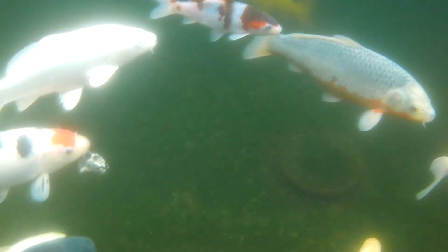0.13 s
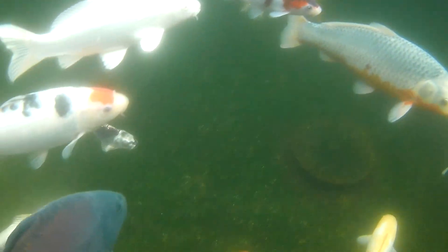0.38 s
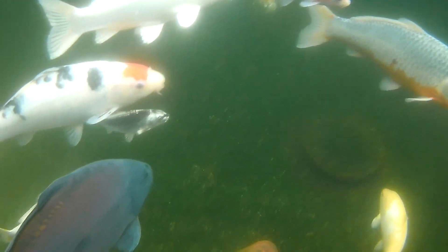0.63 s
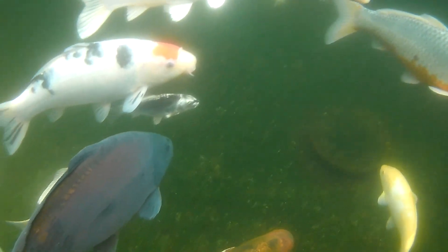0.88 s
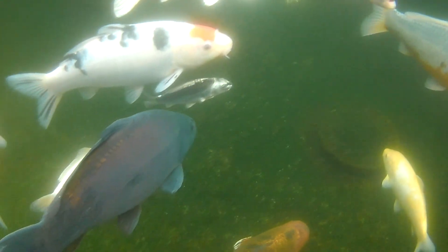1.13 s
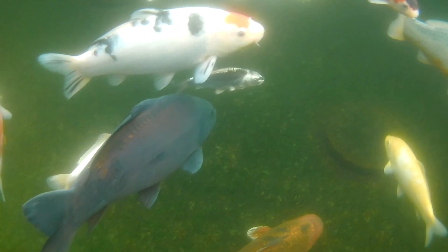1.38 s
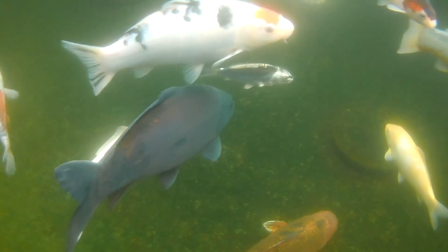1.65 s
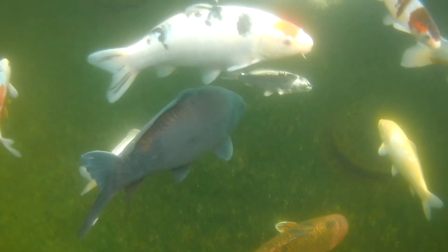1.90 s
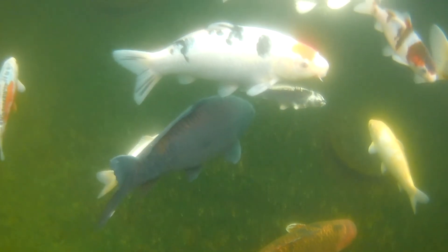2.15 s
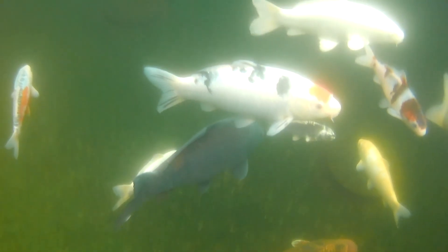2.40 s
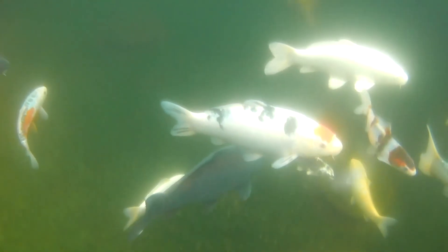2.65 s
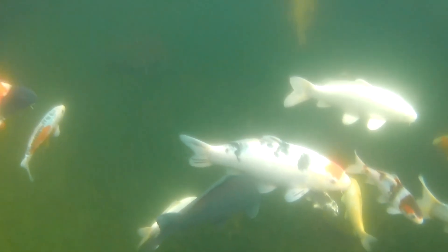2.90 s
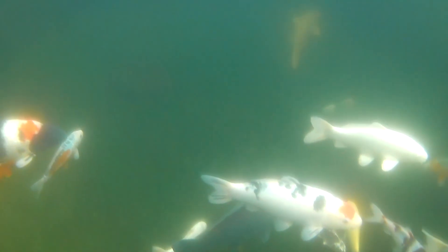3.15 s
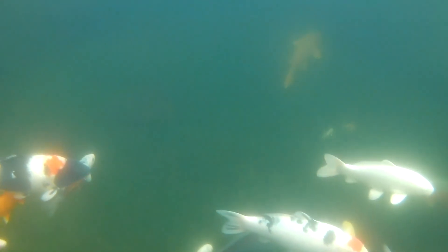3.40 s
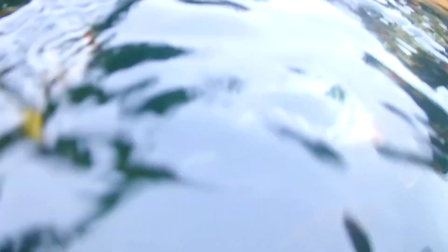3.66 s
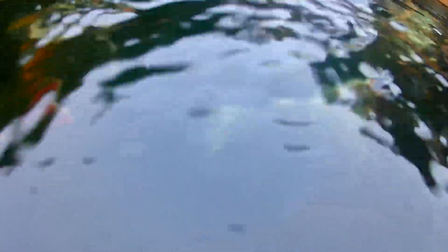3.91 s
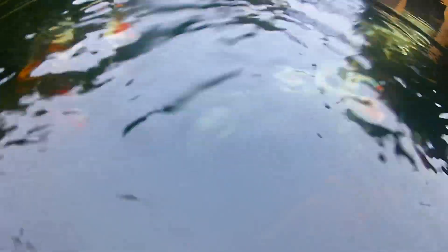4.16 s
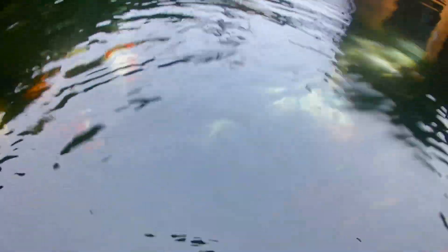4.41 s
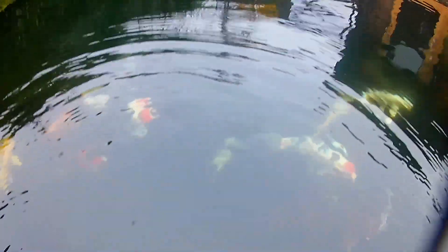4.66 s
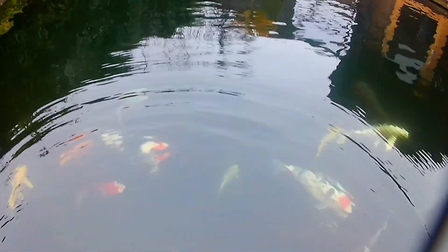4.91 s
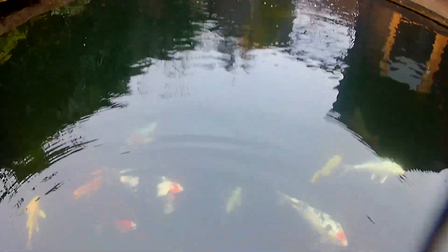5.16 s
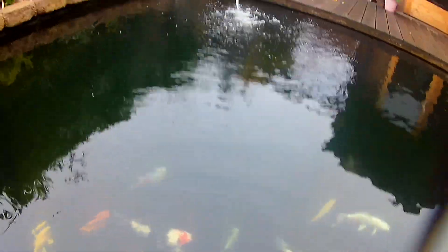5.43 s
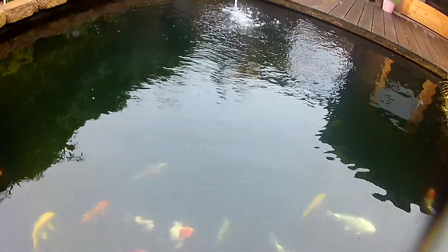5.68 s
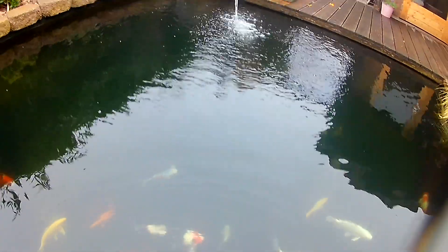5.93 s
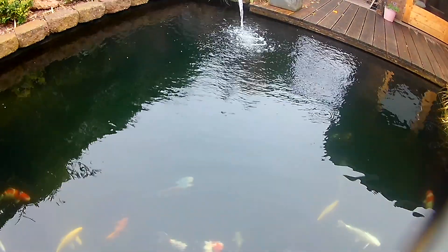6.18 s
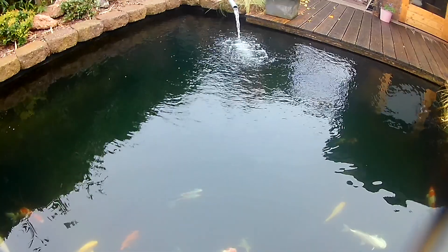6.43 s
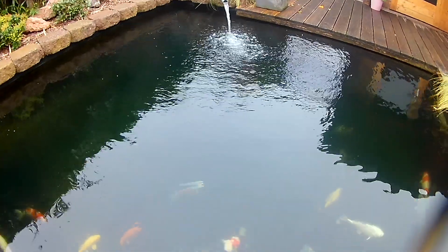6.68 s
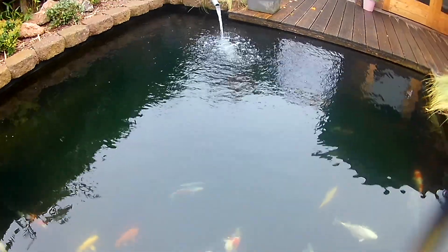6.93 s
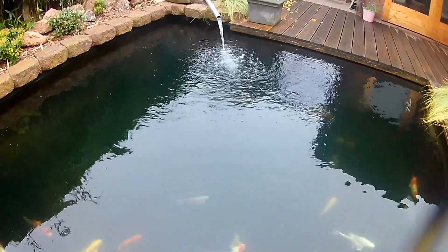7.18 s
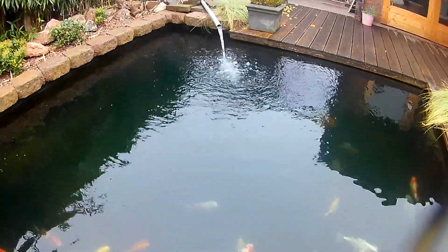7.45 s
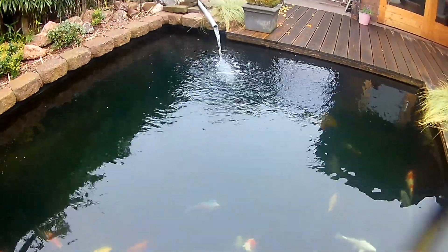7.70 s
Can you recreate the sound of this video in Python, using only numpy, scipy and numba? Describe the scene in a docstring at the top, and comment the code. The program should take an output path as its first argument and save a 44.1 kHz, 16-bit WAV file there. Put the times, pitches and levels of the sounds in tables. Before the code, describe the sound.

Heard from inside a sealed camera housing in a garden pond: soft dull hiss, hollow bubbling of a water spout and low rumbling of the pole. The bubbling fades, a bright wet pop marks the surfacing with a few tiny drops, then handling brings hollow thuds and plastic knocks, loudest just before five and a half seconds. Later come another bump and short dry scrapes, muffled and close.

```python
"""A camera in a sealed housing on a pole hangs in a garden pond. Its hiss, thin whine and treble twitches are
noise and a tone; a water spout's bubbles are clicks that ring the basin, and the swaying pole is low noise.
Soon the pole thuds and jerks: short pushes and swings of its modes. As the housing is lifted out, the spout
fades, knocks ring the lid, and drops splat and pop as bursts of noise and fading tones.
Hands then rub and knock the housing with gritty clicks; at the end dry scrapes slide along the pole."""
import sys
import numpy as np
from scipy import signal
from scipy.fft import rfft, irfft
from scipy.io import wavfile
from scipy.ndimage import uniform_filter1d
from numba import njit

SR = 44100
rng = np.random.default_rng(int(sys.argv[2]) if len(sys.argv) > 2 else 0)


def wrap_up_sound(samples):
    """Save the sound to the file named by the first command line argument, as 16-bit audio."""
    columns = np.atleast_2d(samples).T
    # keep every value between -1 and 1, then stretch to whole-number steps
    tamed = np.clip(columns, -1, 1)
    steps = np.round(tamed * 32767).astype(np.int16)
    wavfile.write(sys.argv[1], SR, steps)


def linear_from_db(decibels):
    """Turn decibels (scalar or array-like) into linear amplitude factors; 0 gives 1."""
    return 10 ** (np.asarray(decibels, float) / 20)


N = 344729
T = np.arange(N) / SR  # time of every sample, s

# colour of the camera's hiss: f/Hz, relative level/dB
HISS_COLOUR = [(80, -35), (140, -3.5), (300, -9.5), (500, -13.5), (1100, -20), (1450, -22), (2150, -21),
               (3000, -27), (4200, -29), (6200, -31.5), (7800, -38), (8800, -35), (15700, -35)]
# thin whine of the camera: f/Hz, mean level/dB
WHINE = (1087, -80)
# middles of the treble twitches of the electronics: t/s
TWITCH_TIMES = [.108, .273, .405, 2.066, 2.225, 2.422, 2.636, 2.865, 3.064, 3.217, 3.361, 3.54, 3.718,
                3.887, 4.111, 4.265, 4.414, 4.589, 4.762, 4.985, 7.281, 7.413, 7.557, 7.691]
# treble bands in each twitch: f/Hz, width/Hz, relative level/dB
TWITCH_BANDS = [(10460, 1300, 13), (11400, 710, 8), (9000, 900, -7)]
# spout heard under water, fading as the housing nears the surface:
# t/s, level/dB, middle group relative level/dB, top group relative level/dB
SPOUT_LEVELS = [(0.0, -56, -7, -18), (0.5, -57, -8, -23), (0.9, -56.5, -7.5, -18.5),
                (2.05, -54.5, -8.5, -25), (2.3, -59, -5.5, -16), (2.6, -61, -2.5, -10),
                (2.85, -60.5, -7, -11.5), (3.05, -67, -0.5, -6), (3.42, -77, -7, -15)]
# basin resonances in a low, a middle and a top group, each: f/Hz, width/Hz, relative level/dB
BASIN_GROUPS = [
    [(606, 53, 0), (763.4, 30, -3), (836, 47, -3.5), (890, 34, -7), (1062, 48, -12)],
    [(1355, 67, -5), (1602, 118, -2), (1940, 84, -3.5), (2080, 100, -2)],
    [(2596, 190, 0), (3030, 300, -8), (3480, 240, -9)],
]
# large clumps of bubbles that stand out: t/s, low group boost/dB, middle group boost/dB
BUBBLE_CLUMPS = [(.43, 4.5, 1), (.51, 8.5, 0), (.83, 3.5, 8), (0.896, 11.5, 12.5), (.99, 3, 1),
                 (1.04, 0, 5), (1.15, 8, 3), (1.22, 2, 2), (1.33, 2.5, 4), (1.43, -1.5, 6), (1.47, 9, -5),
                 (1.51, 1.5, 5), (1.6, 7, -6), (1.72, -7, 6.5), (1.77, 6.5, -5), (1.9, -0.5, 5),
                 (2.039, 7, 3.5), (2.25, 5, 9.5), (2.84, 0, 1)]
# random level flutter of the bubbles in the low, middle and top group: spread/dB
BUBBLE_FLUTTER = (2.5, 2.5, 5)
# pole swaying in the hand: t/s, lowest modes level/dB, next modes level/dB
SWAY_LEVELS = [(0.0, -56, -55), (0.5, -48.5, -57.5), (1.4, -51.5, -56.5), (1.72, -44, -56.5),
               (2.0, -52.5, -61.5), (2.45, -47.5, -57), (2.7, -42, -63), (3.1, -41, -57),
               (3.85, -44, -54.5), (4.2, -49, -61.5), (4.45, -48.5, -53.5), (4.75, -40.5, -54.5),
               (5.2, -47, -54.5), (5.65, -42.5, -52.5), (6.3, -39, -58.5), (6.55, -47.5, -56.5),
               (7.0, -44, -63), (7.5, -46, -62.5), (7.82, -46, -62)]
# ringing modes of the pole: f/Hz, relative level/dB, time to fall 60 dB/s
POLE_MODES = [(45.8, 1, .25), (70, -2.5, 0.12), (108, -2.5, 0.2), (170, -2.5, 0.1), (270, 5, 0.067),
              (337, -4.5, .07)]
# blows on the pole: t/s, peak level/dB, favoured f/Hz, push length/ms, direction/+-1
POLE_BLOWS = [(0.2575, -26, 72, 5.2, -1), (1.731, -40.5, 70, 13, 1), (2.704, -41.5, 70, 6.9, 1),
              (2.998, -38, 70, 12, 1), (3.129, -40.5, 70, 13, 1), (3.69, -42, 108, 6.5, 1),
              (4.604, -37, 170, 4.2, 1), (4.916, -37.5, 108, 5, 1), (5, -36.5, 108, 3.7, 1),
              (5.146, -37, 170, 3.6, 1), (5.274, -32, 170, 3.7, -1), (5.299, -24.5, 170, 3.7, -1),
              (5.338, -23, 70, 5.4, -1), (5.367, -25, 89.5, 3.4, 1), (5.418, -15.5, 108, 2.5, 1),
              (5.448, -9, 101, 2.8, 1), (6.183, -31.5, 117, 2.2, 1), (6.294, -39.5, 270, 3.1, 1),
              (6.41, -38, 117, 3.5, 1), (6.6645, -18.5, 77, 2.4, -1), (6.741, -34, 80.4, 2.2, 1),
              (6.787, -30.5, 101, 2.2, 1), (7.546, -43, 108, 6.1, 1)]
# jerks of the hand that swing the whole pole: t/s, level before rise and fall/dB, f/Hz
HAND_JERKS = [(.262, -38, 44.6), (4.598, -29.5, 39.8), (4.921, -26, 41), (5.02, -24.5, 38), (5.35, -29, 43),
              (5.438, -18.5, 43), (6.78, -34, 41)]
# housing modes below the lid's pitch: f/Hz, width/Hz, relative level/dB
SHELL_MODES = [(566.6, 45.7, 3.5), (890, 109, -1.5), (1115, 66, -6), (1350, 280, -10.5), (333, 34, -2.5)]
# housing modes above the lid's pitch: f/Hz, width/Hz, relative level/dB
EDGE_MODES = [(2680, 50, -1.5), (3270, 550, 1), (3700, 120, 4), (4956, 120, -7), (6100, 170, -10.5)]
# knocks and ticks on the housing:
# t/s, lid peak level/dB, lid f/Hz, shell relative level/dB, edges relative level/dB
HOUSING_KNOCKS = [(2.8075, -45, 1650, 6.5, -13), (2.838, -58, 1630, -3, -26),
                  (4.148, -57.5, 2080, -17, -10), (4.5459, -37, 2080, -10.5, -3.5),
                  (4.7034, -51.5, 2410, -16, -15), (5.001, -50, 1740, -12, -25),
                  (5.1454, -49.5, 1700, 4, -19), (5.1816, -38.5, 1835, -5, -12),
                  (5.2708, -33.5, 1880, -15, -24), (5.282, -48, 1960, -14, -33),
                  (5.295, -27, 1750, -2.5, -23), (5.3283, -34, 1940, 0, -24), (5.3482, -57, 1700, 3, -23),
                  (5.362, -29, 1700, -9, -19), (5.367, -32, 1780, -1, -22), (5.4153, -26, 2020, -1.5, -20),
                  (5.444, -23, 1830, -8.5, -20), (6.6615, -30, 1940, 1.5, -36),
                  (6.7352, -41.5, 1900, -2.5, -26), (6.757, -57, 1920, 0, -12),
                  (6.787, -37, 1790, -5.5, -15), (6.81, -59, 1750, 8, -19), (7.6892, -51.5, 2000, 2, -15)]
# drops splatting on the housing as it leaves the water:
# t/s, bright spot peak level/dB, bright spot f/Hz, broad splat relative level/dB
WATER_DROPS = [(3.431, -46, 6030, 3), (3.567, -47, 2430, 1), (3.697, -62.5, 6100, -6),
               (3.939, -57.5, 2780, -7), (4.478, -59, 1750, -6), (4.685, -56, 2440, 5.5),
               (4.727, -58, 3380, 1)]
# a drop pops on the lid as it leaves the water: t/s, level/dB
LID_POP = (3.4508, -16)
# ringing of that pop: f/Hz, relative level/dB, time to fall 60 dB/s
LID_POP_MODES = [(2187, 2, 0.029), (2355, 0, 0.022), (655, -31, 0.1), (3514, -23.5, 0.012)]
# skin rubbing the housing:
# start t/s, length/s, start level/dB, change over the stroke/dB, shell relative level/dB
SKIN_RUBS = [(4.599, .12, -55, -18.5, -3.5), (4.912, 0.15, -64.5, -2.5, -5.5),
             (5.251, 0.061, -54.5, 9, -3.5), (5.293, 0.165, -50, -6, 6), (6.178, .21, -58.5, -1, -4),
             (6.398, .1, -65, -4, -3)]
# dry scrapes along the pole:
# start t/s, length/s, start level/dB, change over the stroke/dB, start f/Hz, end f/Hz
POLE_SCRAPES = [(7.5218, 0.066, -33, -6, 1940, 2050), (7.593, .04, -37.5, -4, 2400, 2400),
                (7.697, 0.12, -63, 10, 2000, 2050)]
# broad colour of the scrapes: f/Hz, relative level/dB
SCRAPE_TONE = [(250, -16), (335, -7.5), (420, -28), (600, -13.5), (880, -2.5), (1400, -5.5), (2200, 0),
               (2900, -11), (3650, -5), (4900, -18.5), (5350, -35), (6400, -31), (7400, -41), (8000, -16),
               (9300, -9), (15000, -36.5)]
# pole resonances rung by the scrapes: f/Hz, width/Hz, mean relative level/dB
SCRAPE_MODES = [(900, 190, -4.5), (1470, 180, -18), (3600, 150, -13), (4550, 230, -22)]

HISS_DB, TWITCH_DB, TWITCH_LENGTH_S = -65, -79.5, 0.035
CLUMP_S = 0.018  # half-width of a clump, where its boost is down to 1/e
JERK_RISE_S, JERK_T60_S = 0.0166, 0.44
JERK_UNDER_HZ, JERK_UNDER_DB = 27.3, -3  # the lowest mode swings along
LID_WIDTH_HZ, EDGE_HZ = 197, 3600  # width of the lid's ring; edge pitch favoured by a knuckle
CONTACT_MS, DROP_MS = 1.51, 3.0  # each force is strongest halfway through this time
SHELL_RATTLE_S, SHELL_RATTLE = 0.01, 0.33  # the shell chatters on after a knock: decay, share
CRACK_DB, EDGE_CRACK_DB = -20, -14.5  # broad snap of a contact, under the ring of lid and of edges
DRIPS_START_S, DRIPS_END_S, DRIPS_PER_S, DRIPS_DB = 2.8, 4.8, 7.8, -62.5
RUB_EDGE_S, SCRAPE_T60_S = 0.01, 0.069  # softening of a rub's ends; fading after a scrape
WALL_HZ, WALL_LEAK_DB = 7090, -29  # treble above this pitch only leaks through the wall


def unit(x):
    """Scale to an rms (average strength) of 1."""
    return x / np.sqrt(np.mean(x ** 2))


def curves(table):
    """Draw each column against time; the first falls silent outside the table."""
    s, db, *rest = np.transpose(table)
    level = np.interp(T, s, db, left=-200, right=-200)
    return [level] + [np.interp(T, s, column) for column in rest]


@njit
def svf(x, hz, width):
    """Band-pass filter whose centre can move; two stored states carry the ringing."""
    y, b, l = np.empty(len(x)), 0., 0.
    for i in range(len(x)):
        g, k = np.tan(np.pi * hz[i] / SR), width / hz[i]
        v = (b + g * (x[i] - l)) / (1 + g * (g + k))
        b, l, y[i] = 2 * v - b, l + 2 * g * v, k * v
    return y


def band(x, hz, width):
    """One resonance, with a fixed or moving pitch."""
    return svf(x, hz + np.zeros(len(x)), 1. * width)


def body(x, modes):
    """Resonances side by side, alternate in sign."""
    return sum((-1) ** k * linear_from_db(db) * band(x, hz, w) for k, (hz, w, db) in enumerate(modes))


def rfftfreq(n):
    """Pitch of each step of the spectrum, in Hz."""
    return np.arange(n // 2 + 1) * SR / n


def colour(x, points):
    """Shape the spectrum by (Hz, dB) points, then scale to rms 1."""
    hz, db = np.transpose(points)
    f = np.maximum(rfftfreq(len(x)), 1)
    gain = linear_from_db(np.interp(np.log(f), np.log(hz), db))
    return unit(irfft(rfft(x) * gain, len(x)))


def walk(rate):
    """Slow smooth chance, about rate new values per second, rms 1."""
    k = int(SR / rate)
    steps = np.repeat(rng.standard_normal(N // k + 1), k)
    return unit(uniform_filter1d(uniform_filter1d(steps, k), k)[:N])


def grains(rate, spread_db):
    """Random clicks, about rate per second, a few much larger than the rest."""
    happens = rng.random(N) < rate / SR
    return happens * rng.choice([-1., 1.], N) * linear_from_db(spread_db * rng.exponential(size=N))


def add(out, s, x):
    """Mix x in at time s."""
    i = int(s * SR)
    out[i:i + len(x)] += x[:N - i]


def camera():
    """The camera's own noise: hiss, a whine of slightly wavering level and gated treble twitches."""
    hiss = linear_from_db(HISS_DB + 0.48 * walk(3.42)) * colour(rng.standard_normal(N), HISS_COLOUR)
    whine_hz, whine_db = WHINE
    whine = linear_from_db(whine_db + 2.8 * walk(6.8)) * np.sqrt(2) * np.sin(2 * np.pi * whine_hz * T)
    gate = sum(np.abs(T - s) < TWITCH_LENGTH_S / 2 for s in TWITCH_TIMES)
    gate = uniform_filter1d(1. * gate, size=100)  # soften its switching
    noise = rng.standard_normal(N)
    twitch = unit(sum(linear_from_db(db) * band(band(noise, hz, w), hz, w) for hz, w, db in TWITCH_BANDS))
    return hiss + whine + linear_from_db(TWITCH_DB) * gate * twitch


def spout():
    """Bubbles come in clumps; each basin resonance hears the shared plunge and bubbles of its own size."""
    db, *rel_db = curves(SPOUT_LEVELS)
    clumps_db = sum(np.outer((low, mid, 0), np.exp(-((T - s) / CLUMP_S) ** 2))
                    for s, low, mid in BUBBLE_CLUMPS)
    plunge = unit(grains(600, spread_db=2.5) * linear_from_db(4.6 * walk(14)))
    out = 0
    groups = zip(BASIN_GROUPS, [0] + rel_db, clumps_db, BUBBLE_FLUTTER)
    for modes, group_db, clump_db, flutter_db in groups:
        rung = 0
        for hz, w, mode_db in modes:
            own = unit(grains(400, spread_db=2.5) * linear_from_db(flutter_db * walk(18)))
            drift = hz * (1 + 0.012 * walk(6.06))
            ring = band(band(0.5 * plunge + own, drift, w), drift, 3 * w)
            rung = rung + linear_from_db(mode_db) * unit(ring)
        out = out + linear_from_db(db + group_db + clump_db) * unit(rung)
    return out


def sway():
    """The shaky hand keeps the lowest pole modes moving."""
    db, over_db = curves(SWAY_LEVELS)
    # modes: f/Hz, width/Hz, relative level/dB
    low = body(rng.standard_normal(N), [(39.74, 13.9, 0.5), (26.3, 15, -1.5)])
    over = body(rng.standard_normal(N), [(67.8, 17, 2.0), (105, 43, -6.0)])
    return linear_from_db(db) * unit(band(low, 45, 40)) + linear_from_db(over_db) * unit(band(over, 64, 80))


def favour(modes, hz, db_per_octave):
    """Modes far from the struck spot's own pitch get less of the blow."""
    return [(f, a, b - db_per_octave * abs(np.log2(f / hz))) for f, a, b in modes]


def thuds():
    """A soft push rings the pole modes, the lowest kicking back; longer pushes leave the upper ones asleep."""
    out, t = np.zeros(N), T[:SR // 2]
    sides = np.where(np.arange(len(POLE_MODES)) > 0, 1., -1.)
    pole = [(f, t60, d) for f, d, t60 in POLE_MODES]
    for s, db, hz, ms, way in POLE_BLOWS:
        modes = favour(pole, hz, db_per_octave=8)
        ring = sum(side * linear_from_db(d) * np.sin(2 * np.pi * f * t) * 1000. ** (-t / t60)
                   for side, (f, t60, d) in zip(sides, modes))
        push = np.hanning(int(max(ms, .5) * SR / 1000) + 3)
        blow = signal.fftconvolve(ring, push)[:len(t)]
        add(out, s, np.sign(way) * linear_from_db(db) * blow / np.abs(blow).max())
    return out


def jerks():
    """The pole swings out within a cycle and settles."""
    out, t = np.zeros(N), T[:SR // 2]
    envelope = np.minimum(t / JERK_RISE_S, 1) * 1000. ** (-t / JERK_T60_S)
    under = linear_from_db(JERK_UNDER_DB) * np.sin(2 * np.pi * JERK_UNDER_HZ * t)
    for s, db, hz in HAND_JERKS:
        swing = np.sin(2 * np.pi * hz * t) + under
        add(out, s, linear_from_db(db) * envelope * swing)
    return out


def crack(x, hz):
    """A broad band, steep outside, scaled to a peak of 1."""
    y = band(band(x, hz, 1.0 * hz), hz, 1.0 * hz)
    return y / np.abs(y).max()


def knocks():
    """A gritty contact of a few ms rings lid, shell and edges."""
    out, t = np.zeros(N), T[:SR // 8]
    push = t * 1000 / CONTACT_MS * np.exp(-t * 2000 / CONTACT_MS)
    rise = np.minimum(t * 1000 / CONTACT_MS, 1)
    rattle = SHELL_RATTLE * push.max() * rise * np.exp(-t / SHELL_RATTLE_S)
    edge_modes = favour(EDGE_MODES, EDGE_HZ, db_per_octave=16)
    grits = rng.standard_normal((len(HOUSING_KNOCKS), len(t)))
    for (s, db, hz, shell_db, edge_db), grit in zip(HOUSING_KNOCKS, grits):
        lid = band(push * (0.54 * np.cos(2 * np.pi * hz * t) + grit), hz, LID_WIDTH_HZ)
        hit = push * grit
        shell = band(body(hit + rattle * grit, SHELL_MODES), 580, 1400)
        edges = body(hit, edge_modes)
        parts = lid, shell, edges, crack(hit, 1100), crack(hit, EDGE_HZ)
        dbs = 0, shell_db, edge_db, CRACK_DB, edge_db + EDGE_CRACK_DB
        add(out, s, sum(linear_from_db(db + d) * p / np.abs(p).max() for p, d in zip(parts, dbs)))
    return out


def drips():
    """Faint drips off the wet housing: sparse tiny splats of noise on the lid."""
    t = T[:SR // 50]
    splat = band(rng.standard_normal(len(t)) * t * np.exp(-t / 0.0029), 2250, 500)
    ticks = grains(DRIPS_PER_S, spread_db=2.0) * (T > DRIPS_START_S) * (T < DRIPS_END_S)
    return linear_from_db(DRIPS_DB) * signal.fftconvolve(ticks, splat / np.abs(splat).max())[:N]


def drops():
    """A few ms of spreading water: broad noise with one brighter region."""
    out, t = np.zeros(N), T[:SR // 20]
    spread = t * 1000 / DROP_MS * np.exp(-t * 2000 / DROP_MS)
    grits = rng.standard_normal((len(WATER_DROPS), len(t)))
    for (s, db, hz, broad_db), grit in zip(WATER_DROPS, grits):
        spot = band(band(spread * grit, hz, 750), hz, 1500)
        broad = linear_from_db(broad_db) * crack(spread * grit, 2000)
        add(out, s, linear_from_db(db) * (spot / np.abs(spot).max() + broad))
    return out


def pop():
    """Two close modes start opposed, so the ring swells, dips and returns; the film snaps at the start."""
    out, t = np.zeros(N), T[:SR // 8]
    s, pop_db = LID_POP
    ring = sum((-1) ** k * linear_from_db(db) * np.cos(2 * np.pi * hz * t) * 1000. ** (-t / t60)
               for k, (hz, db, t60) in enumerate(LID_POP_MODES))
    snap = crack(rng.standard_normal(len(t)) * np.exp(-t / .003), 2300)
    add(out, s, linear_from_db(pop_db) * (ring + linear_from_db(-29) * snap))
    return out


def stroke(s, length, db, change_db):
    """Progress 0-1 through a stroke, and its gain, which holds its last value afterwards."""
    way = np.clip((T - s) / length, 0, 1)
    return way, (T > s) * linear_from_db(db + change_db * way)


def rubs():
    """Skin sticks and slips on the housing: dense clicks ring lid, edges and shell."""
    slip = grains(2200, spread_db=2.1) * linear_from_db(2.8 * walk(45))
    hz = 1830 * (1 + 0.035 * walk(30))
    lid = unit(band(band(slip, hz, 340), hz, 620) + linear_from_db(-24) * body(slip, EDGE_MODES))
    shell = unit(band(body(slip, SHELL_MODES), 460, 720))
    out = 0
    for s, length, db, change_db, shell_db in SKIN_RUBS:
        way, gain = stroke(s, length, db, change_db)
        gain = uniform_filter1d(gain * (way < 1), int(RUB_EDGE_S * SR))
        out = out + gain * (lid + linear_from_db(shell_db) * shell)
    return out


def scrape():
    """Fast broad grit rings the pole unevenly; one resonance can shift as the contact slides."""
    grit = grains(9000, spread_db=2.1) * linear_from_db(1.75 * walk(120))
    rings = sum(linear_from_db(db + 3.6 * walk(40)) * unit(band(grit, hz, w)) for hz, w, db in SCRAPE_MODES)
    broad = colour(grit, SCRAPE_TONE) + 0.21 * rings
    out = 0
    for s, length, db, change_db, hz, end_hz in POLE_SCRAPES:
        way, gain = stroke(s, length, db, change_db)
        lift = 1000. ** (-np.maximum(T - s - length, 0) / SCRAPE_T60_S)  # fades after the stroke
        sliding = unit(band(grit, hz + (end_hz - hz) * way, 220))
        out = out + gain * lift * unit(broad + 0.42 * sliding)
    return out


def scene():
    """The housing wall stops most treble from outside; the camera's own noise is inside it."""
    outside = spout() + sway() + thuds() + jerks() + knocks() + drips() + drops() + pop() + rubs() + scrape()
    wall = signal.ellip(6, .5, 50, WALL_HZ, fs=SR, output="sos")
    through = signal.sosfilt(wall, outside)
    leak = linear_from_db(WALL_LEAK_DB) * (outside - through)
    return (through + leak + camera())[None]


def band_limit(x):
    """A steep low-pass at the top of the band."""
    return signal.sosfilt(signal.butter(12, 15900, fs=SR, output="sos"), x)


def record(dry):
    """Weaken the lowest bass, below about 15 Hz, and finish the mix."""
    bass_cut = signal.butter(1, 15, "high", fs=SR, output="sos")
    mix = signal.sosfilt(bass_cut, dry)
    return band_limit(mix)


dry = scene()
out = record(dry)
wrap_up_sound(out)
```